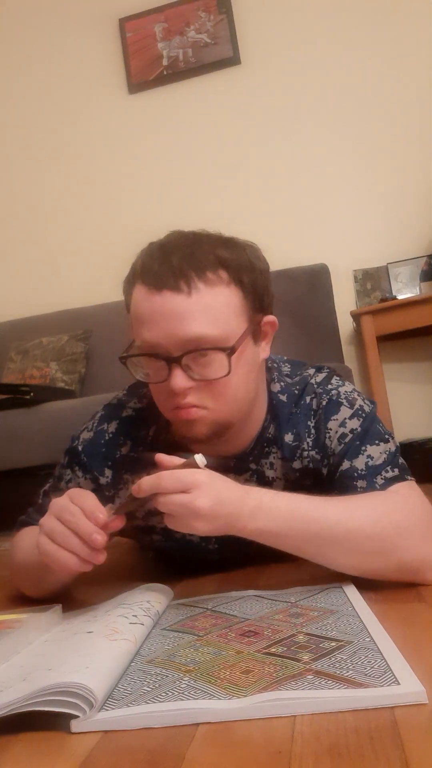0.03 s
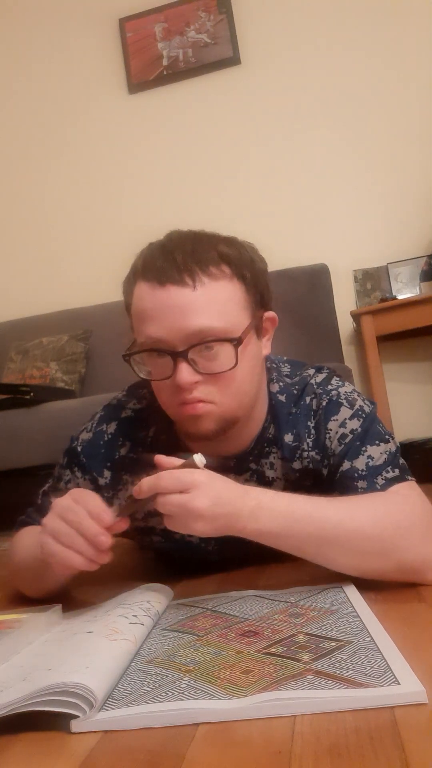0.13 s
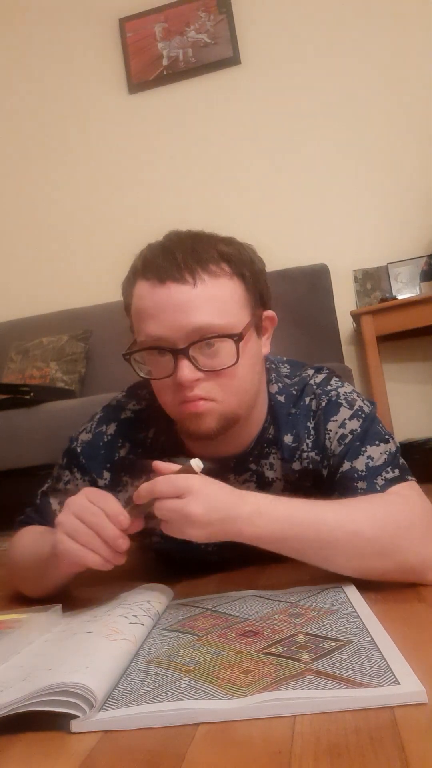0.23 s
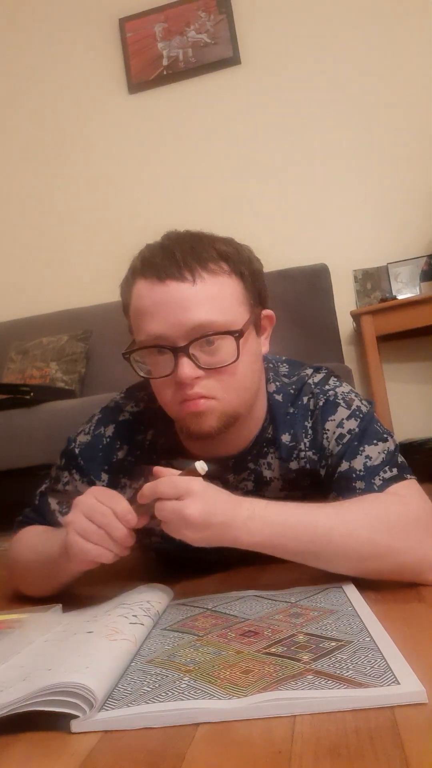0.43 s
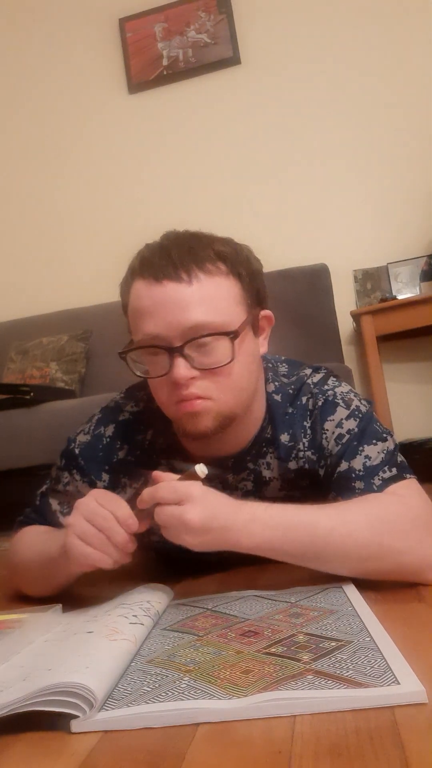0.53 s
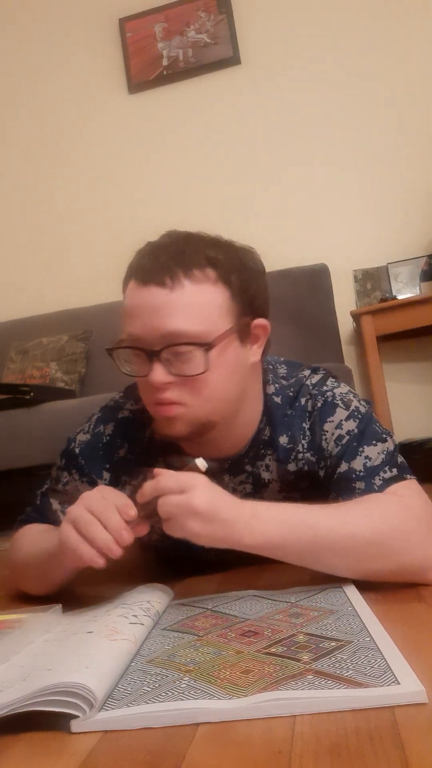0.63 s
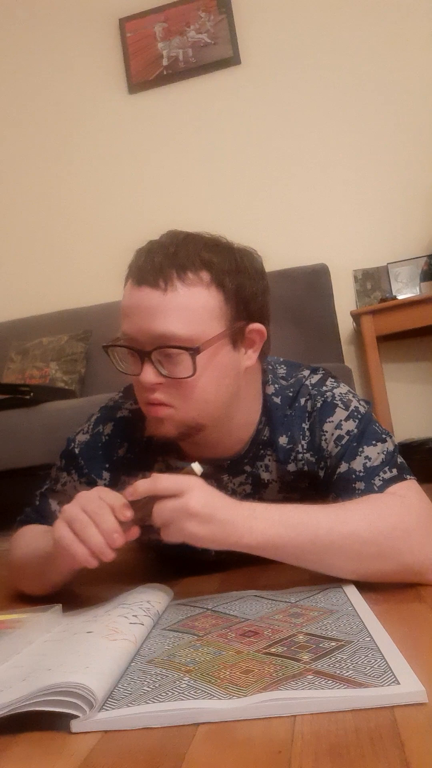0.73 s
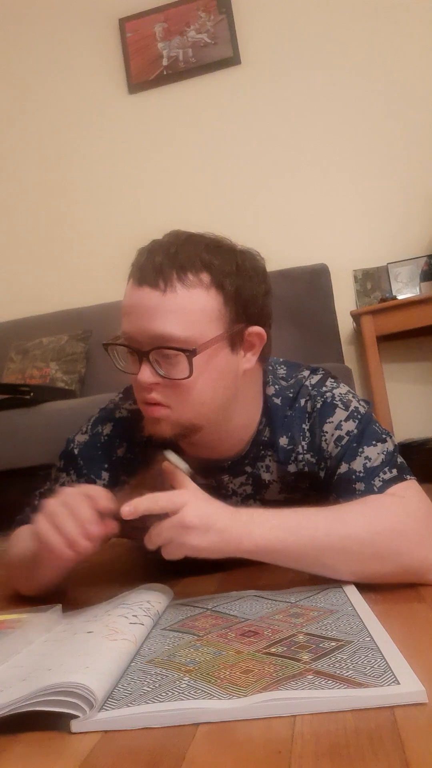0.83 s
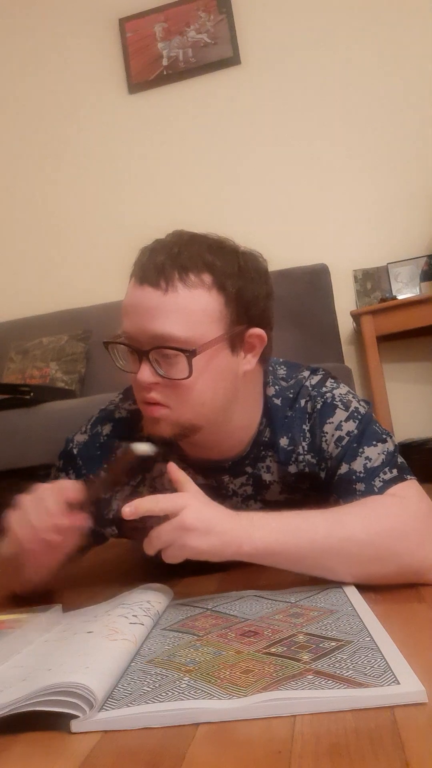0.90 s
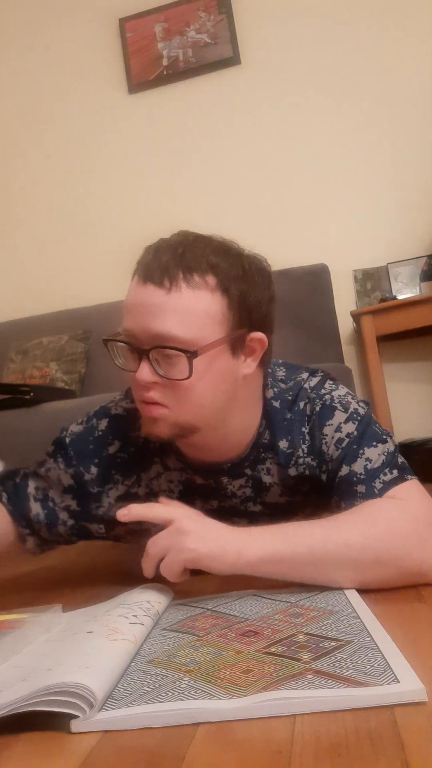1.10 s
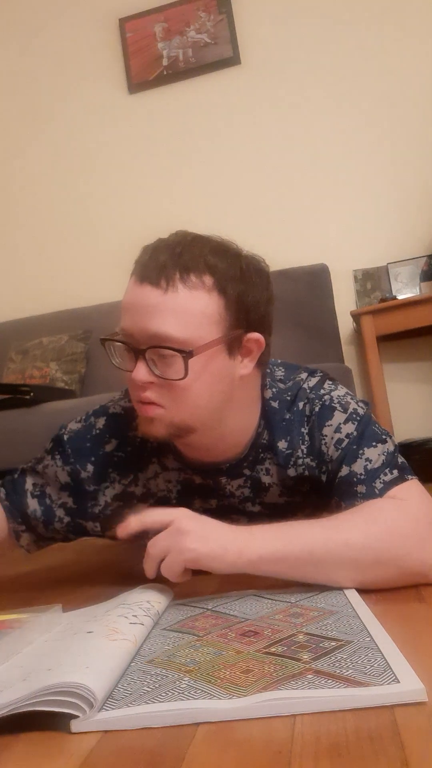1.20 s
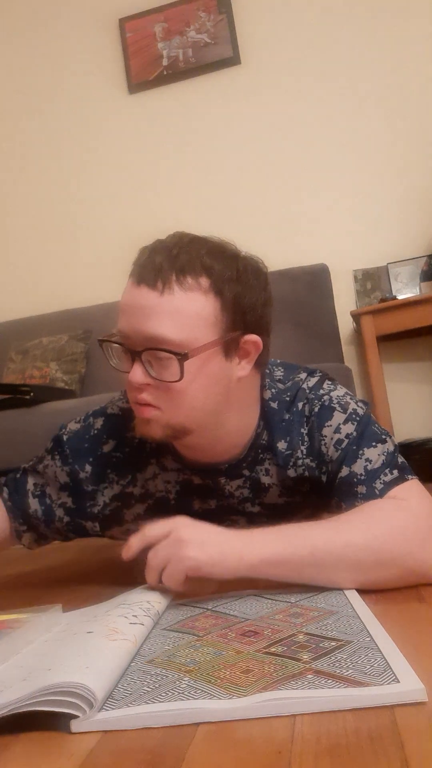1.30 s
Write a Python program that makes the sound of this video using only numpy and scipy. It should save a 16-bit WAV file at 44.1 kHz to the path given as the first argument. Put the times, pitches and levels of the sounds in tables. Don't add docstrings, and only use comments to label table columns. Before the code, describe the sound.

A plastic marker cap snaps shut: one hard, bright click at 0.41 s, with tight table reflections, a short airy room tail and a faint dull knock just after. Before it, light scuffs at 0.03 and 0.05 s, a tiny high squeak, then a rapid burst of ticks with a soft knock around 0.18-0.23 s. Faint scuffs follow near 0.66 and 1.2 s, with sleeve rustle, quiet low drone and hiss throughout.

```python
import sys
import numpy as np
from scipy import signal
from scipy.fft import rfft, irfft
from scipy.io import wavfile
from scipy.ndimage import uniform_filter1d

SR = 44100
rng = np.random.default_rng(int(sys.argv[2]) if len(sys.argv) > 2 else 0)


def boost_factor(decibels):
    exponent = np.asarray(decibels, float) / 20
    return 10 ** exponent


def transcribe(u):
    v = np.clip(np.atleast_2d(u).T, -1, 1)
    q = np.round(v * 32767).astype(np.int16)
    wavfile.write(sys.argv[1], SR, q)


N = 59535


def rms_one(x):
    return x / np.sqrt(np.mean(x ** 2) + 1e-20)


def in_time(rows):
    return np.interp(np.arange(N) / SR, *np.transpose(rows))


def at_hz(points, hz):
    table = np.array(points)
    return np.interp(np.log(hz), np.log(table[:, 0]), table[:, 1])


def coloured(spectrum):
    low_hz, high_hz = spectrum[0][0], spectrum[-1][0]

    def gain_at(hz):
        ends = np.minimum(hz / low_hz, 1) ** 3 * np.minimum(high_hz / hz, 1) ** 6
        return boost_factor(at_hz(spectrum, hz)) * ends
    return gain_at


def filtered(x, order, edge_hz, kind):
    return signal.sosfilt(signal.butter(order, edge_hz, kind, fs=SR, output="sos"), x)


def low_passed(x, order, stop_db, stop_hz):
    return signal.sosfilt(signal.cheby2(order, stop_db, stop_hz, fs=SR, output="sos"), x)


def ring(clicks, hz, t60_s):
    r = boost_factor(-60 / (t60_s * SR))
    w = 2 * np.pi * hz / SR
    return signal.lfilter([0, np.sin(w)], [1, -2 * r * np.cos(w), r * r], clicks + 1e-18)


def burst(length_s, chance):
    n = np.arange(chance.shape[-1])
    decay = np.exp(-n / SR / max(length_s, 1e-4))
    shape = np.where(n == 0, 5.0, chance ** 3) * decay
    return shape / np.sqrt(np.sum(shape ** 2, axis=-1, keepdims=True))


# freq_hz, likeness [clipped to -0.9 to 0.9]
CHANNEL_LIKENESS = [(60, 2.6), (130, -0.6), (290, 3.4), (640, 0.38), (1410, -0.44), (3100, 0.08),
                    (6820, -0.1), (15000, -0.1)]
# freq_hz, left_minus_right_db
CHANNEL_LEAN = [(60, 4), (180, -1), (550, -2.5), (1650, 6.5), (4970, 3.5), (15000, -5)]


def noise(gain_at):
    hz = np.maximum(np.fft.rfftfreq(N, 1 / SR), 1)
    mid, side = rfft(rng.standard_normal((2, N)))
    alike = np.clip(at_hz(CHANNEL_LIKENESS, hz), -.9, .9)
    lean_db = at_hz(CHANNEL_LEAN, hz) / 2 * [[1], [-1]]
    pair = np.sqrt(1 + alike) * mid + np.sqrt(1 - alike) * side * [[1], [-1]]
    return rms_one(irfft(pair * gain_at(hz) * boost_factor(lean_db), N))


# freq_hz, level_db_per_hz
DRONE_COLOUR = [(15, -78), (25, -41), (59, -16), (188, -21.5), (253, -8), (671, -11), (729, -17.5),
                (919, -11.5), (1300, -30), (1690, -61.5), (2860, -120)]
# time_s, level_db
DRONE_SWELL = [(0.0, -55), (0.09, -56), (0.386, -53), (0.698, -56.5), (1.124, -56), (1.248, -54),
               (1.35, -59.5)]
# freq_hz, width_hz, level_db
CASING = [(62, 17, -87.5), (154.3, 21, -74), (255.25, 2.7, -61), (296.6, 4, -66.5), (344, 54, -62.5),
          (402.9, 9.2, -63.5), (465.5, 19, -66), (525, 23, -69.5), (551, 4.7, -75), (696.7, 2, -68),
          (900, 3.4, -82.5), (983, 15.6, -69.5), (2790, 110, -81)]


def drone():
    swell_db = in_time(DRONE_SWELL)
    tones = 0
    for hz, width_hz, level_db in CASING:
        tones = tones + boost_factor(level_db) * noise(lambda f: 1 / (1 + (2 * (f - hz) / width_hz) ** 2))
    rumble = boost_factor(swell_db - 1.0) * noise(coloured(DRONE_COLOUR))
    return rumble + boost_factor(swell_db - swell_db.mean()) * tones


# freq_hz, level_db_per_hz
HISS_COLOUR = [(710, -46), (1200, -5.5), (1500, -5.5), (2410, -16), (2720, -9), (3520, -24), (6930, -20.5),
               (9370, -22.5), (15700, -24)]
HISS_DB = -71.5


def hiss():
    return boost_factor(HISS_DB) * noise(coloured(HISS_COLOUR))


# freq_hz, level_db_per_hz
CLOTH_COLOUR = [(2000, -12), (3500, -5), (5000, -22), (7500, 6), (9500, -5.5), (12500, -1.5), (15800, -5.5)]
# time_s, level_db
RUSTLE = [(0, -95), (.022, -112), (.03, -64.5), (.1, -86), (.16, -70), (.3, -75.5), (.75, -78),
          (.86, -79.5), (.93, -72), (1.0, -85), (1.1, -89), (1.2, -82), (1.27, -76), (1.35, -82.5)]


def rustle():
    return boost_factor(in_time(RUSTLE)) * noise(coloured(CLOTH_COLOUR))


# freq_hz, t60_s
ROOM_T60 = [(1000, 0.77), (2000, 0.34), (5000, 0.4041), (8000, 0.3016), (12000, 0.2643), (16000, 0.33)]
# freq_hz, left_minus_right_db
ROOM_LEAN = [(1000, 2.5), (2000, 4.5), (4000, 4.5), (8000, -3), (14000, -0.5)]
# freq_hz, level_db
SNAP_ROOM_COLOUR = [(800, -23), (1500, -24), (2400, -6.5), (4000, -6), (6200, 0.5), (8000, -1.5),
                    (12000, -4), (15500, -8)]
# freq_hz, level_db
TICK_ROOM_COLOUR = [(1000, -7), (2500, 2), (5000, -6.5), (8000, 3.5), (10500, -4.5), (13000, 1.5),
                    (15500, 4)]
SNAP_ROOM_DB, TICK_ROOM_DB, ROOM_RISE_S = -18.5, -27.5, 0.011


def room(x, colour, level_db):
    t = np.arange(SR // 2) / SR
    edges_hz = 600 * 2 ** np.arange(0, 5, 1 / 3)
    white = rng.standard_normal((2, 2, len(t)))
    tail = 0
    for k, (low_hz, high_hz) in enumerate(zip(edges_hz, edges_hz[1:])):
        hz = np.sqrt(low_hz * high_hz)
        band = filtered(white[k % 2], 2, [low_hz, high_hz], "band")
        decay_db = at_hz(colour, hz) - 60 * t / at_hz(ROOM_T60, hz)
        lean_db = at_hz(ROOM_LEAN, hz) * np.array([[.5], [-.5]])
        tail = tail + band * boost_factor(decay_db + lean_db)
    tail = tail * (1 - np.exp(-t / ROOM_RISE_S))
    return boost_factor(level_db) * signal.fftconvolve(tail, x.mean(0, keepdims=True), axes=1)[:, :N]


ECHO_DELAYS = [.001, .0029, .0037, .0058, .0086, .0116, .0128, .018]
# left_db, right_db, scatter_s
ECHOES = [(0, -22.5, .0005), (-7.5, -39, 0.00039), (4.5, -22.5, .0002), (-0.5, -27, .0003),
          (-22.5, -30.5, .0003), (-8.5, -19, .001), (-14, -21.5, .0015), (-19.5, -31.5, .001)]


def echoes(x):
    path = np.zeros((2, 2048))
    scattered = rng.standard_normal((len(ECHOES), 2, 512))
    scattered = scattered * scattered[..., :1]
    for delay_s, (left_db, right_db, scatter_s), chance in zip(ECHO_DELAYS, ECHOES, scattered):
        i = int(delay_s * SR)
        path[:, i:i + 512] += boost_factor(np.array([[left_db], [right_db]])) * burst(scatter_s, chance)
    return signal.fftconvolve(path, x, axes=1)[:, :N]


# start_s, length_s, from_hz, to_hz, level_db
SQUEAKS = [
    (.125, .055, 11200, 12300, -72),
    (1.155, .06, 13900, 13000, -77),
]
SQUEAK_WOBBLE_HZ = 120


def squeaks():
    out = np.zeros((2, N))
    for start_s, length_s, from_hz, to_hz, level_db in SQUEAKS:
        u = np.linspace(0, 1, int(length_s * SR))
        wobble = uniform_filter1d(rng.standard_normal((2, N)), size=64)[:, :len(u)] * 8
        pitch_hz = from_hz + (to_hz - from_hz) * u + SQUEAK_WOBBLE_HZ * wobble
        phase = np.cumsum(pitch_hz, axis=1) * 2 * np.pi / SR
        i = int(start_s * SR)
        out[:, i:i + len(u)] += boost_factor(level_db) * np.sin(np.pi * u) * np.sin(phase)
    return out


# start_s, level_db, pitch_hz, t60_s
KNOCKS = [
    (0.2185, -35.5, 327, 0.0793),
    (0.432, -57, 153.7, 0.24),
]


def knocks():
    out = np.zeros(N)
    for start_s, level_db, hz, t60_s in KNOCKS:
        push = np.zeros(N)
        push[int(start_s * SR)] = boost_factor(level_db)
        out += filtered(ring(push, hz, t60_s), 2, [1.0 * hz, 1.8 * hz], "band")
    return out


TICK_TIMES = [.0255, .0535, .175, .1808, .1872, .1905, .1952, .1988, .2015, .204, .2125, .2203, .2238,
              .2297, .2332, .662, 1.215]
TICK_LENGTHS = [.02, .012, .0005, .0005, .0006, .0006, .0003, .004, .001, .0012, .004, .0004, .0008, .0008,
                .002, .015, .015]
# level_db, pitch_hz, left_minus_right_db
TICKS = [(-52, 22000, 8), (-50, 2700, 5.5), (-47, 8000, -4), (-44, 2636, 3.5), (-32.5, 8650, -6),
         (-41.5, 8403, -7.5), (-35, 3255, -6), (-36.5, 2310, 8), (-40, 16000, 1.5), (-31.5, 8500, 2.5),
         (-43, 2600, 4), (-25.5, 15000, -2.5), (-36.5, 9000, -1.5), (-36, 5000, 10.5), (-33, 9500, 0.5),
         (-53, 12300, 4), (-62, 2960, 0.5)]
TICK_RING_CYCLES = 18
TICK_OWN_DB, TICK_SHELL_DB, TICK_SPREAD_DB = 4, -3, 3
TICK_BRIGHT_DB_PER_OCTAVE = 1
HELD_DAMPING = .45
BODY_CUT_HZ = 1900


def ticks():
    out = np.zeros((2, N))
    tint = rng.standard_normal((len(TICKS), len(SHELL), 2))
    grain = rng.standard_normal((len(TICKS), 2, 3000))
    for start_s, length_s, tick, chance, grains in zip(TICK_TIMES, TICK_LENGTHS, TICKS, tint, grain):
        level_db, hz, pan_db = tick
        click = burst(length_s, grains)
        sound = boost_factor(TICK_OWN_DB) * ring(click, hz, TICK_RING_CYCLES / hz)
        for (shell_hz, t60_s), port_db, c in zip(SHELL[2:], SHELL_DB[2:], chance):
            bright_db = TICK_BRIGHT_DB_PER_OCTAVE * np.log2(shell_hz / 6000)
            mode_db = TICK_SHELL_DB + bright_db + np.mean(port_db) + TICK_SPREAD_DB * c
            sound = sound + boost_factor(mode_db)[:, None] * ring(click, shell_hz, HELD_DAMPING * t60_s)
        i = int(start_s * SR)
        out[:, i:i + sound.shape[1]] += sound * boost_factor(level_db + np.array([[pan_db], [-pan_db]]) / 2)
    return filtered(out, 3, BODY_CUT_HZ, "high")


SNAP_S = .40995
# left_db, right_db
SNAP_DB = (-15.5, -8)
# pitch_hz, t60_s
SHELL = [(895, .06), (1005, .05), (2330, .009), (2910, .006), (3950, .007), (5080, .006), (6540, .008),
         (7550, .004), (11000, .006), (13000, .0045), (14600, .004)]
# left_db, right_db
SHELL_DB = [(-19.5, -17), (-22.5, -25), (-17, -25.5), (-13, -23), (-8, -9.5), (-11.5, -14), (-3.5, -5.5),
            (-7, -2.5), (-4.5, -11), (-4.5, -3), (-13.5, -14)]
# delay_s, pitch_hz, t60_s, left_db, right_db
CRACK = (.00016, 10000, .0006, -12, -1)


def snap():
    out = np.zeros((2, N))
    for k, ((hz, t60_s), port_db) in enumerate(zip(SHELL, SHELL_DB)):
        clicks = np.zeros((2, N))
        clicks[:, int(SNAP_S * SR)] = boost_factor(np.add(port_db, SNAP_DB)) * (-1) ** k
        out += ring(clicks, hz, t60_s)
    delay_s, hz, t60_s, *crack_db = CRACK
    clicks = np.zeros((2, N))
    clicks[:, int((SNAP_S + delay_s) * SR)] = boost_factor(np.array(crack_db))
    return filtered(out + ring(clicks, hz, t60_s), 3, BODY_CUT_HZ, "high")


TICK_ECHO_DB, QUIET_CUTOFF_HZ = -9, 16000
PORT_NOTCH_HZ, PORT_NOTCH_WIDTH_HZ, PORT_NOTCH_SHARE = 9400, 1300, .7


def scene():
    direct, small = snap(), ticks()
    blow = np.zeros((1, N))
    blow[0, int(SNAP_S * SR)] = 1
    air = hiss() + rustle()
    tails = room(blow, SNAP_ROOM_COLOUR, SNAP_ROOM_DB) + room(small, TICK_ROOM_COLOUR, TICK_ROOM_DB)
    rest = small + echoes(direct + boost_factor(TICK_ECHO_DB) * small) + tails + air
    bright = direct + low_passed(rest, 20, 70, QUIET_CUTOFF_HZ)
    b, a = signal.iirpeak(PORT_NOTCH_HZ, PORT_NOTCH_HZ / PORT_NOTCH_WIDTH_HZ, SR)
    bright = bright - PORT_NOTCH_SHARE * signal.lfilter(b, a, bright)
    return bright + knocks() + drone() + squeaks()


def top_cut(x):
    return signal.sosfilt(signal.butter(12, 16820, fs=SR, output="sos"), x)


CUTOFF_HZ, RUMBLE_CUT_HZ = 16800, 50


def record(dry):
    cut = low_passed(dry, 16, 60, CUTOFF_HZ)
    mix = filtered(cut, 2, RUMBLE_CUT_HZ, "high")
    return top_cut(mix)


dry = scene()
out = record(dry)
transcribe(out)
```